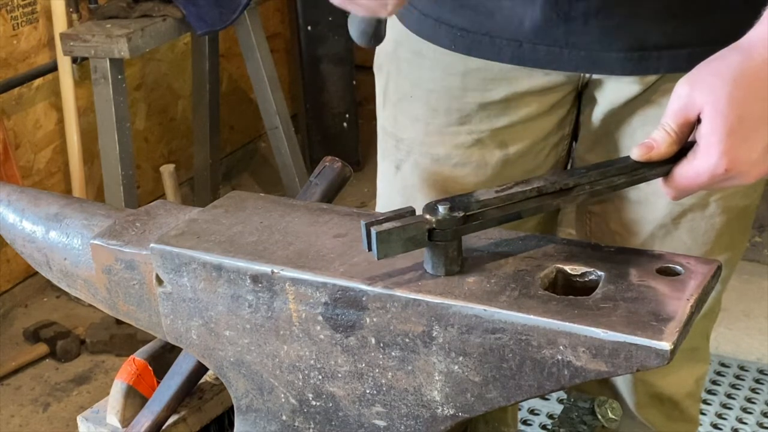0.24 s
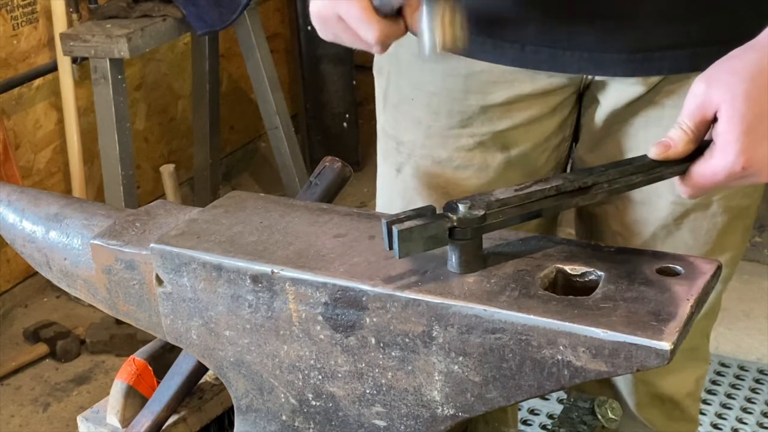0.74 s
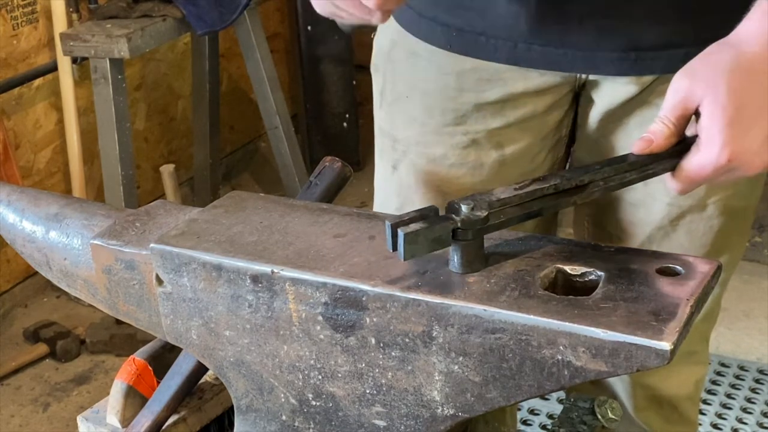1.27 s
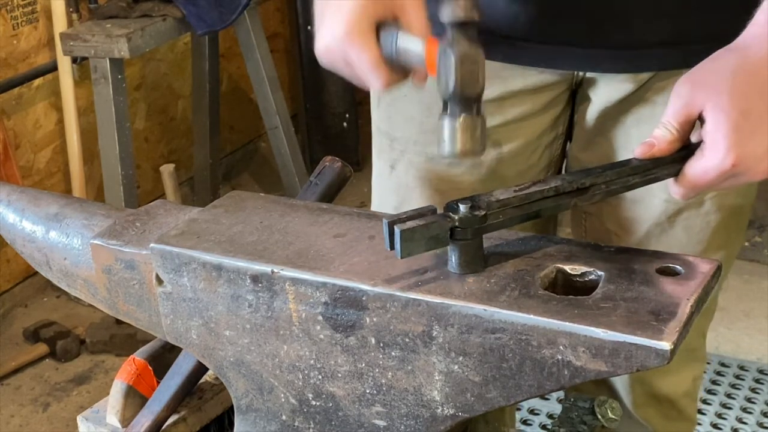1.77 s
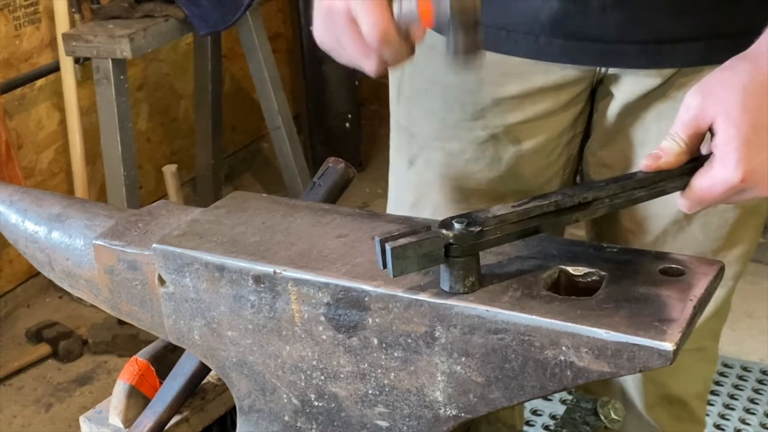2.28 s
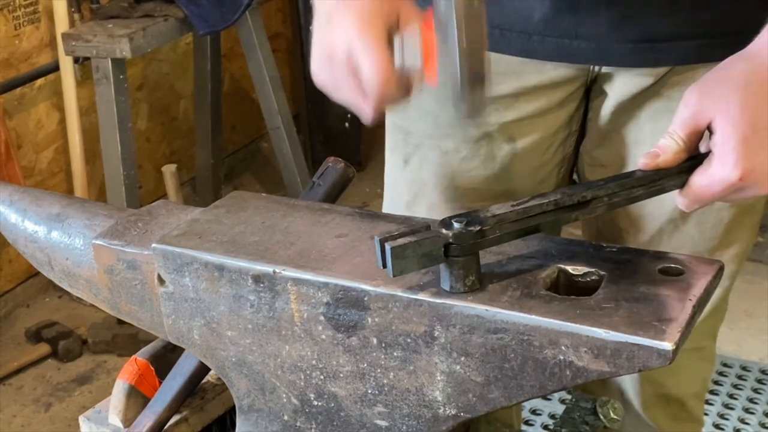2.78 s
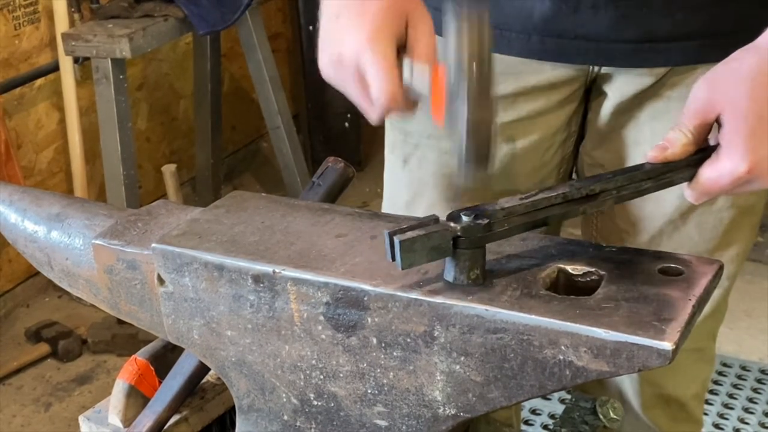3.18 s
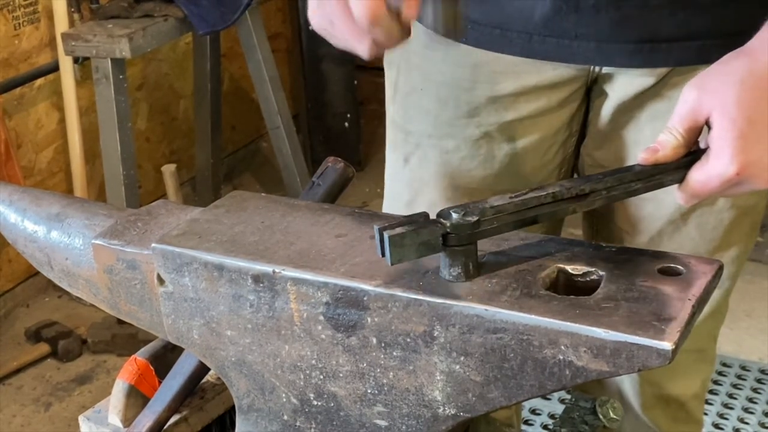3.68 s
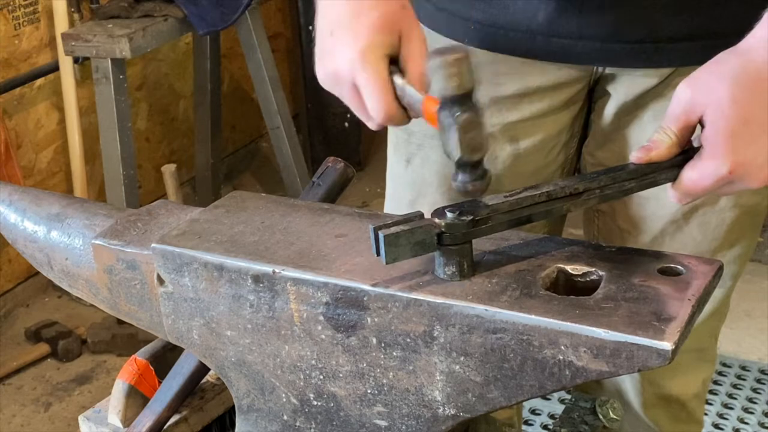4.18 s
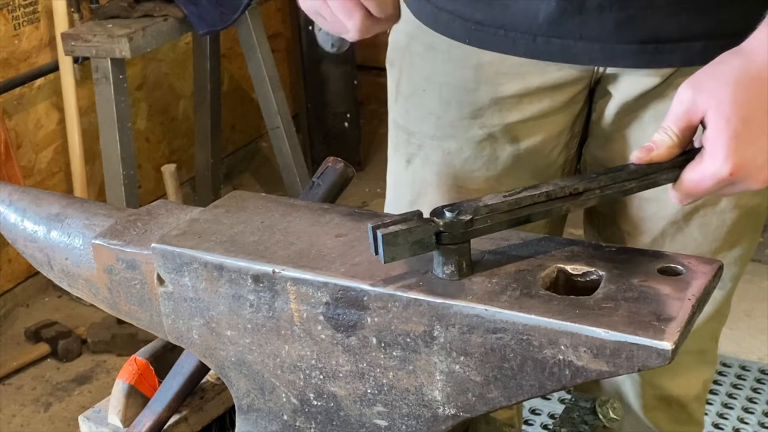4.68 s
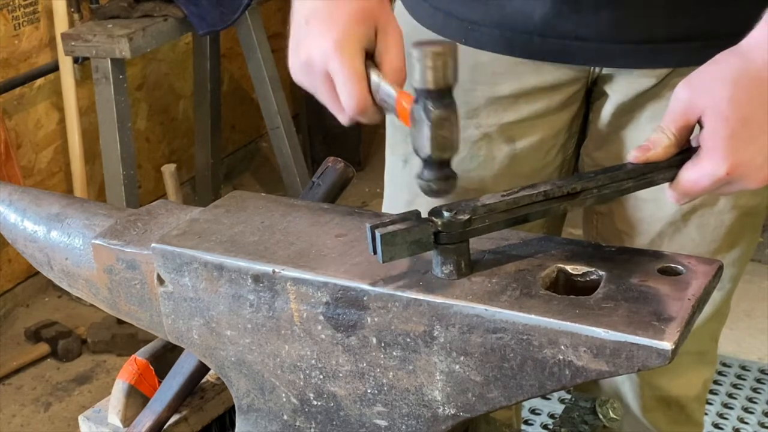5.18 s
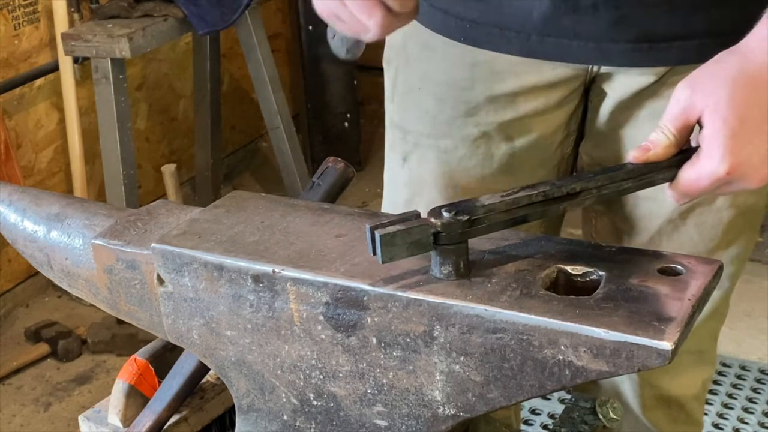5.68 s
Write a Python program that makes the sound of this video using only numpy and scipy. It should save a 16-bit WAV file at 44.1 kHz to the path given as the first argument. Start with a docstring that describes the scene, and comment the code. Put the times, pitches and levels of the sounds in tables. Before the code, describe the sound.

A small hammer taps a rivet held in tongs on an anvil. After a fading blow and a single strike there is a short gap, then a steady run of loud, sharp metallic clanks about every third of a second, two of them weaker. The ring is damped, the stand bumps dully beneath, and wooden workshop walls give a short reverb over a very quiet low hum. Close microphone, blows nearly central.

```python
"""The tail of a hammer blow, then about three blows a second: a ball-peen hammer sets a rivet in tongs on an anvil.
Each blow is a crack (shaped noise), a damped steel ring (decaying sines) and a thud from the stand (gliding
wave and modes), spread by a timber forge (decaying noise). Between them: ticks, bumps, a rustle and a squeak,
over a low hum (band noise). The sound drops out once while a blow lands."""
import sys
import numpy as np
from scipy import signal
from scipy.fft import rfft, irfft, next_fast_len
from scipy.io import wavfile

SR = 44100
rng = np.random.default_rng(int(sys.argv[2]) if len(sys.argv) > 2 else 0)


def to_wav(s):
    """Save 16-bit WAV."""
    ch = np.atleast_2d(s).T  # columns
    pcm = np.round(np.clip(ch, -1, 1) * 32767)  # PCM
    wavfile.write(sys.argv[1], SR, pcm.astype(np.int16))


N = 261949
RUN_IN = 8820   # samples computed before the audible start
LENGTH = N + RUN_IN


def from_db(db):
    """Decibels to amplitude gain."""
    return 10 ** (np.asarray(db) / 20)


def at_hz(points, hz):
    """A (Hz, value) table read on a log-frequency axis."""
    table = np.array(points)
    return np.interp(np.log(hz), np.log(table[:, 0]), table[:, 1])


def scene_time_s():
    """Time of every sample, zero at the audible start."""
    return (np.arange(LENGTH) - RUN_IN) / SR


def bandpass(x, low_hz, high_hz):
    """Second-order Butterworth band."""
    return signal.sosfilt(signal.butter(2, [low_hz, high_hz], "band", fs=SR, output="sos"), x)


# Hammer blows. Each row: start in s, crack in dB, thud in dB, tongs' knock in dB, ring in dB,
# lean of the clang to its lower mode in dB, singing tone in dB.
BLOWS = [(-.07, 0, -21, -26.5, -16, -2.2, -20), (0.2671, -1, -24, -33.5, -15.5, 1.8, -17),
         (1.321, 1.2, -17, -24.5, -19, 3, -20), (1.6451, 0.1, -20.5, -26.5, -17.5, 7.5, -19),
         (1.9762, -1.2, -20.5, -28, -17.5, 4.5, -18.5), (2.113, -4, -21.5, -32.5, -21.5, -1, -26),
         (2.4355, -1, -20, -34.5, -17.5, 4.5, -20), (2.7555, -3, -17.5, -30.5, -17, 2, -21.5),
         (3.1104, -2.5, -26.5, -39.5, -16, 0.5, -19.5), (3.4528, 1.5, -16.5, -30.5, -15, 0.7, -19),
         (3.7571, -1.5, -19.5, -35, -17, 1, -16.5), (4.0816, -1, -18, -33.5, -14.5, -2, -18.5),
         (4.4003, -1.5, -19, -33, -16, -0.5, -15.5), (4.7216, -4.5, -18.5, -31.5, -22.5, 0, -26.5),
         (5.0604, -1, -16.5, -32, -16, 1.3, -19.5), (5.3711, -1, -17.5, -32, -17.5, -3, -21.5),
         (5.7106, -2.3, -17.5, -33, -17, 0, -22.5)]
# Colour centres in Hz: tongs, anvil body, then six ring centres, the first two 2.5 kHz and the singing tone.
COLOUR_HZ = [600, 1200, 2500, 3630, 4930, 5160, 7200, 12000]
# Ring centres but the singing tone. Each entry: dB against the blow's ring level.
RING_SHAPE_DB = [-3.5, 1.5, 1, -3.5, -7.5]
BODY_UNDER_THUD_DB = 5   # the anvil's body sounds with the thud


def blow_colour(thud_db, tongs_db, ring_db, lean_db, singing_db):
    """Levels of one blow at the colour centres; the lean trades the two clang modes against each other."""
    lean = lean_db * np.array([0, 1, -1, 0, 0])
    low, *high = ring_db + np.array(RING_SHAPE_DB) + lean
    return np.array([tongs_db, thud_db - BODY_UNDER_THUD_DB, low, singing_db, *high])


# Contact spectrum, before the blow's colour. Each row: Hz, relative dB.
CRACK = [(300, -11.5), (480, 14.5), (800, 4), (1300, 3.5), (2000, 2.5), (3100, 0.5), (4300, -1.5),
         (5600, 1.5), (8000, 3.5), (12000, -2.5), (15300, -0.5), (16300, -16.5)]
# The tongs' jaws tick. Each row: start in s, level in dB on the scale of the blows' cracks.
TICKS = [(0.818, -46), (1.1157, -66)]
# Colour of a tick. Each entry: relative dB at a colour centre.
TICK_COLOUR_DB = [-22, -15, 7.5, 1, 4.5, -.6, 10.5, -16]


def crack(near_db=-2.0, far_db=9.0, rise_s=0.00086, last_s=0.0027, lead_s=0.0008, size=2048):
    """Contact sound coloured like the blow: near by a ragged burst off the steel faces, for the room a clean click."""
    t = np.arange(size) / SR
    burst = (1 - np.exp(-t / rise_s)) ** 2 * np.exp(-t / last_s)
    click = (t == t[48]) * 1.
    hz = np.maximum(np.arange(size // 2 + 1) * SR / size, 20)
    contacts = []
    for s, crack_db, *levels in BLOWS:
        colour_db = blow_colour(*levels)
        contacts.append((s, crack_db + colour_db - colour_db.mean()))
    contacts += [(s, tick_db + np.array(TICK_COLOUR_DB)) for s, tick_db in TICKS]

    near_far = np.zeros((2, LENGTH + size))
    noise = rng.standard_normal((len(contacts), size))
    for (s, colour_db), white in zip(contacts, noise):
        gain = from_db(np.interp(np.log(hz), np.log(COLOUR_HZ), colour_db) + at_hz(CRACK, hz))
        start = round((s - lead_s) * SR) + RUN_IN   # the faces touch just before the force peaks
        near_far[0, start:start + size] += from_db(near_db) * burst * irfft(rfft(white) * gain)
        near_far[1, start:start + size] += from_db(far_db) * irfft(rfft(click) * gain)
    return near_far[:, :LENGTH]


# Modes of anvil, hammer and tongs. Each row: Hz, dB on top of the blow's colour, t60 in s.
STEEL = [(603.7, 9, 0.07), (744, 4.5, 0.048), (1074, 2, 0.033), (1505, -7, 0.06), (1707, -4, 0.046),
         (1985, -3.5, 0.023), (2247, -12.5, 0.077), (2433, 2.5, 0.031), (2611, -6, 0.055),
         (2690, -6, 0.013), (3578, -2, 0.044), (3637, -20.5, .25), (3650, -3.5, 0.044), (4260, -20, 0.13),
         (4870, -8.5, 0.023), (4890, -6.5, 0.049), (5104, -8, 0.063), (5120, 4.5, 0.033),
         (5225, -12, 0.069), (5300, -13.5, 0.086), (5950, -10, 0.05), (6430, 0.5, 0.021),
         (6880, -3.5, 0.046), (7100, -0.5, 0.051), (8886, -4.5, 0.23), (9780, -0.5, 0.037),
         (10920, -6.5, 0.068), (11950, -5.5, 0.065), (12760, -1, .06), (14800, -7, .03), (14500, -7.5, .03)]


def steel(spread_db=2.5, detune=0.0049, swell_s=0.0012):
    """Decaying sines: each blow strikes every mode with its own strength and a slightly different pitch, at random."""
    t = np.arange(SR // 3) / SR
    out = np.zeros(LENGTH + SR)
    hz, level_db, t60_s = np.transpose(STEEL)[:, :, None]
    chance = rng.standard_normal((len(BLOWS), 2, len(STEEL), 1))
    swell = 1 - np.exp(-t / swell_s)   # the contact lasts, the ring swells
    for (s, crack_db, *levels), (strength, pitch) in zip(BLOWS, chance):
        colour_db = np.interp(np.log(hz), np.log(COLOUR_HZ), blow_colour(*levels))
        start_db = colour_db + level_db + spread_db * strength
        modes = from_db(start_db - 60 * t / t60_s) * np.sin(2 * np.pi * hz * (1 + detune * pitch) * t)
        start = round(s * SR) + RUN_IN
        out[start:start + len(t)] += swell * modes.sum(axis=0)
    return out[:LENGTH]


def clicks(times_s, gains):
    """One sample of the given size at each time."""
    out = np.full(LENGTH, 1e-18)   # a tiny offset instead of exact zeros
    np.add.at(out, np.round(np.asarray(times_s) * SR).astype(int) + RUN_IN, gains)
    return out


# Modes of stand and floor boards. Each row: Hz, dB, t60 in s, swell in s, side as a share of mid (plus is left).
STAND = [(84.6, 3.5, 0.17, 0.01, -0.026), (121, 3.5, 0.087, 0.006, -.25), (134, 2.5, 0.063, 0.011, -.25),
         (204.6, 8.5, 0.093, 0.013, -.2), (261, 10.5, 0.057, .007, -.05), (316.7, 3, 0.062, 0.0055, -0.074),
         (365.5, 5.5, 0.03, 0.0012, -0.074), (110.5, 5.5, 0.091, 0.011, 0), (447, 4, 0.027, 0.0019, 0.037)]
# Soft low bumps. Each row: start in s, push in dB before the low-pass.
BUMPS = [(2.99, -38), (3.029, -46), (4.949, -60.5)]


def stand(bump_hz=200, glide_db=-2.5, high_hz=480, low_hz=85, fall_s=0.01335, peak_s=0.0057):
    """Mid and side; the stand answers every push alike: a bending wave whose lows come last, and swelling modes."""
    t = np.arange(SR // 2) / SR
    turns = low_hz * t + (high_hz - low_hz) * fall_s * (1 - np.exp(-t / fall_s))
    glide = from_db(glide_db) * t / peak_s * np.exp(1 - t / peak_s) * np.sin(2 * np.pi * turns)
    answer = glide * np.array([[1], [0]])
    for hz, db, t60_s, swell_s, lean in STAND:
        envelope = from_db(db - 60 * t / t60_s) * (1 - np.exp(-t / swell_s)) ** 2
        answer = answer + envelope * np.sin(2 * np.pi * hz * t) * np.array([[1], [lean]])

    blows, bumps = np.array(BLOWS), np.array(BUMPS)
    bump_clicks = clicks(bumps[:, 0], from_db(bumps[:, 1]))
    soft = signal.sosfilt(signal.butter(2, bump_hz, fs=SR, output="sos"), bump_clicks)
    push = clicks(blows[:, 0], from_db(blows[:, 2])) + soft
    return signal.fftconvolve(push[None], answer, axes=1)[:, :LENGTH]


# Stereo width of room and hum. Each row: Hz, side minus mid in dB.
WIDTH = [(60, -20.5), (130, -15), (250, -10), (600, -3), (1400, 0.5), (2200, -31.5), (3500, -55),
         (7000, -42.5)]


def bands(size):
    """Third-octave noise: centre, width, and a pair of mid (rms 1) and side (scaled by WIDTH)."""
    white = rng.standard_normal((2, 2, size))
    edges_hz = 25 * 2 ** np.arange(0, 9.6, 1 / 3)
    for k, (low, high) in enumerate(zip(edges_hz, edges_hz[1:])):
        pair = bandpass(white[k % 2], low, high)   # neighbours use different noise
        pair = pair / pair.std(axis=1, keepdims=True)
        hz = np.sqrt(low * high)
        yield hz, high - low, pair * [[1], [from_db(at_hz(WIDTH, hz))]]


# Reverberation time. Each row: Hz, t60 in s.
ROOM_T60 = [(60, 0.83), (160, 0.53), (420, 0.53), (1100, 0.5), (2000, 0.51), (3500, 0.56), (6000, 0.47),
            (10000, 0.39), (16000, 0.11)]
# Level of the whole tail. Each row: Hz, dB before the sends.
ROOM_LEVEL = [(60, -7), (250, -5), (1000, -1.5), (3000, -0.5), (6000, -9), (12000, -4)]
SAG_DB, SAG_S, SAG_WIDTH_S = 3, 0.087, 0.044   # the tail dips once


def forge(x, build_s=0.007):
    """Mid and side reverberation: noise that builds up and dies band by band, convolved with the source."""
    t, tail = np.arange(SR) / SR, 0
    sag_db = SAG_DB * np.exp(-((t - SAG_S) / SAG_WIDTH_S) ** 2)
    for hz, width_hz, pair in bands(SR):
        envelope = (1 - np.exp(-t / build_s)) * from_db(-sag_db - 60 * t / at_hz(ROOM_T60, hz))
        energy = np.sum(envelope ** 2) * SR / 2 / width_hz   # for unit gain across the band
        tail = tail + pair * envelope * from_db(at_hz(ROOM_LEVEL, hz)) / np.sqrt(energy)
    return signal.fftconvolve(x[None], tail, axes=1)[:, :LENGTH]


# A faint rustle. Each row: time in s, mean level in dB.
RUSTLE = [(.8, -90), (.95, -95.5), (1.02, -78.5), (1.07, -80.5), (1.14, -82), (1.22, -96.5), (1.32, -68)]


def rustle(low_hz=900, high_hz=2600, patchy_db=2.5):
    """Band noise whose level wanders at random every 15 ms, in a pause between blows."""
    noise = bandpass(rng.standard_normal(LENGTH), low_hz, high_hz)
    t = scene_time_s()
    patches = np.interp(t, np.arange(0, 6, 0.015), rng.standard_normal(400))
    level_db = np.interp(t, *np.transpose(RUSTLE), left=-150, right=-150)
    return noise / noise.std() * from_db(level_db + patchy_db * patches)


def ring(x, hz, t60_s):
    """Two-pole resonance: a unit click sets a sine of height 1 ringing."""
    r = from_db(-60 / (t60_s * SR))
    w = 2 * np.pi * hz / SR
    return signal.lfilter([0, np.sin(w)], [1, -2 * r * np.cos(w), r * r], x)


# A faint thin squeak. The row: start in s, end in s, Hz, rms at the top of the swell in dB.
SQUEAK = (1.17, 1.26, 4400, -82)


def squeak(t60_s=0.023):
    """Noise in one narrow resonance, swelling and fading."""
    start_s, end_s, hz, db = SQUEAK
    tone = ring(rng.standard_normal(LENGTH), hz, t60_s)
    progress = np.clip((scene_time_s() - start_s) / (end_s - start_s), 0, 1)
    return from_db(db) * tone / tone.std() * np.sin(np.pi * progress)


# Hum spectrum. Each row: Hz, relative dB per Hz.
HUM = [(18, -40.5), (30, -9), (69, 5), (152, 1.5), (180, -6), (223, 3), (334, -0.5), (359, -13.5),
       (386, -3.5), (592, -19), (828, -20), (910, -25), (6760, -48.5), (9000, -52.5), (11700, -83),
       (19800, -120)]
HUM_DB = -56.5   # rms of the mid


def hum():
    """The low steady rumble of the shop, mid and side: noise weighted band by band."""
    out = sum(pair * np.sqrt(width_hz) * from_db(at_hz(HUM, hz)) for hz, width_hz, pair in bands(LENGTH))
    return from_db(HUM_DB) * out / out[0].std()


def scene(ring_room_db=-2.5, thud_room_db=-2.0, side_db=-19.0, side_lag_s=0.0014):
    """Direct sound near the middle, room and hum around it; returns left and right."""
    rings, (near, far), thud = steel(), crack(), stand()
    metal = rings + near + rustle() + squeak()
    aside = from_db(side_db) * np.roll(metal, round(side_lag_s * SR))   # a nearby face reflects from one side
    # ring and thud share one noise tail, the contact click has another
    body_room = forge(from_db(ring_room_db) * rings + from_db(thud_room_db) * thud[0])
    room = body_room + forge(far)
    mid, side = (np.array([metal, aside]) + thud + room + hum())[:, RUN_IN:]
    return np.array([mid + side, mid - side])


# The dropout. The row: fade-out start in s, fade-out length in s, fade-in end in s, fade-in length in s.
DROPOUT = (2.108, 0.001, 2.162, 0.0055)
TREBLE_HZ, TREBLE_LAG_S = 6700, 10 / 44100   # reference of the phase slope; left behind right
IN_STEP_BELOW_HZ, APART_ABOVE_HZ = 7300, 8300
CUTOFF_HZ = 17100   # stop-band edge


def record(dry):
    """The treble reaches the right channel before the left, lower sound in step; a dropout, rounded peaks, a cut top."""
    size = next_fast_len(N + 256)
    hz = np.arange(size // 2 + 1) * SR / size
    apart = np.clip((hz - IN_STEP_BELOW_HZ) / (APART_ABOVE_HZ - IN_STEP_BELOW_HZ), 0, 1)
    phase = np.pi * TREBLE_LAG_S * (hz - TREBLE_HZ) * apart * np.array([[-1], [1]])
    x = irfft(rfft(dry, size) * np.exp(1j * phase), size)[:, :N]

    out_s, out_len_s, in_s, in_len_s = DROPOUT
    corners_s = [out_s, out_s + out_len_s, in_s - in_len_s, in_s]
    x = x * np.interp(np.arange(N) / SR, corners_s, [1, 0, 0, 1]) ** 2
    x = signal.sosfilt(signal.butter(2, 40, "high", fs=SR, output="sos"), x)   # the microphone drops the deepest bass
    x = 0.96 * np.tanh(x / 0.85)
    return signal.sosfilt(signal.cheby2(16, 95, CUTOFF_HZ, fs=SR, output="sos"), x)


dry = scene()
out = record(dry)
to_wav(out)
```